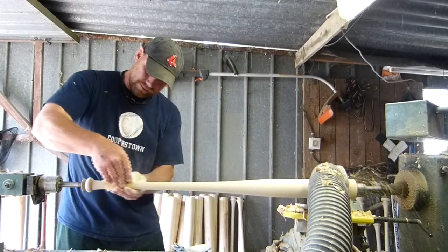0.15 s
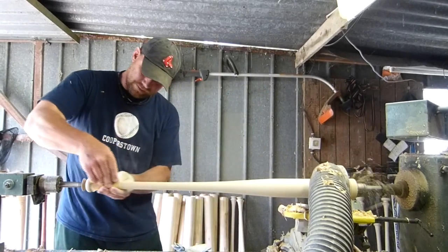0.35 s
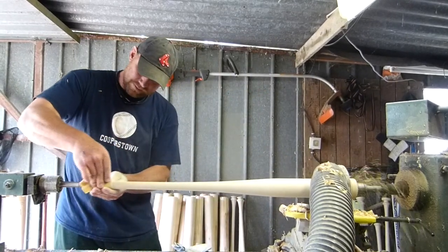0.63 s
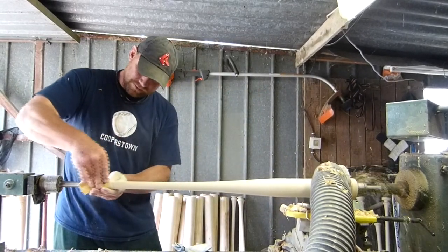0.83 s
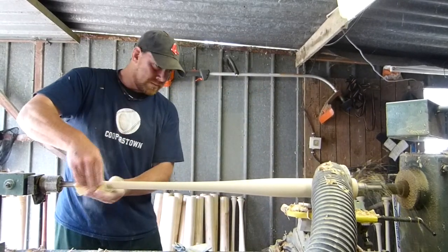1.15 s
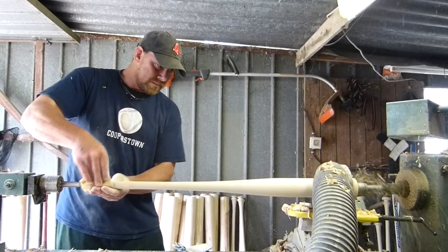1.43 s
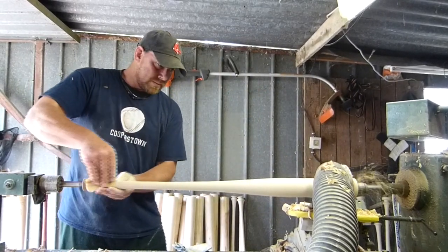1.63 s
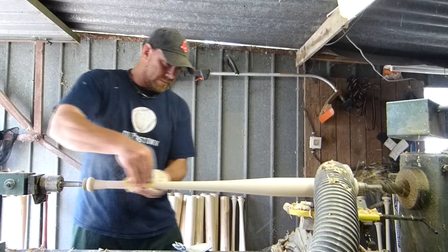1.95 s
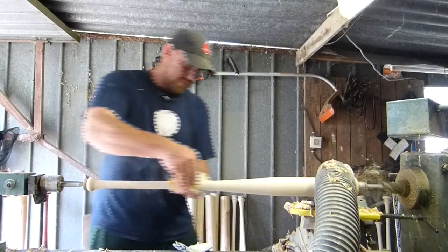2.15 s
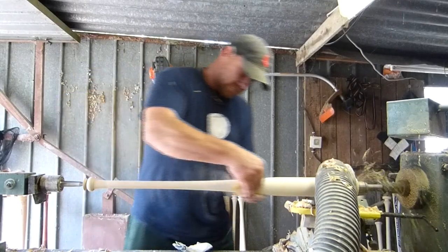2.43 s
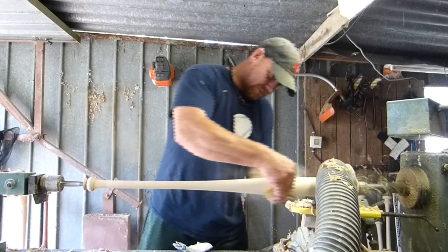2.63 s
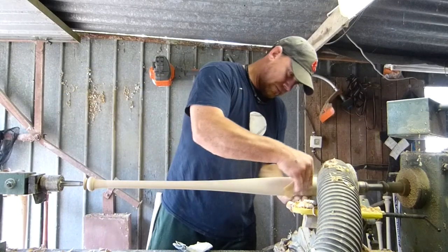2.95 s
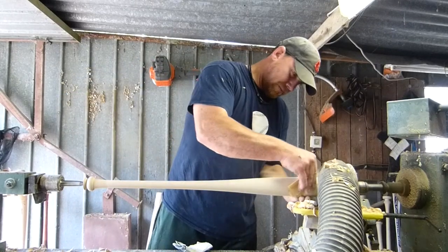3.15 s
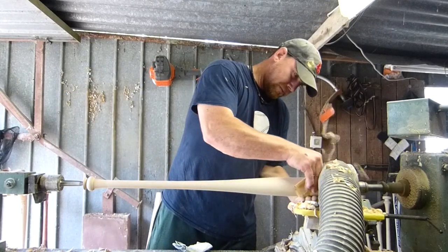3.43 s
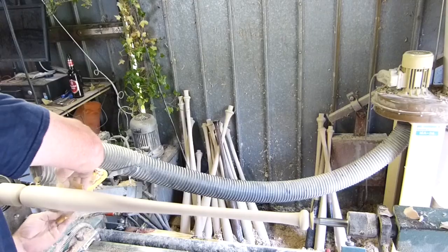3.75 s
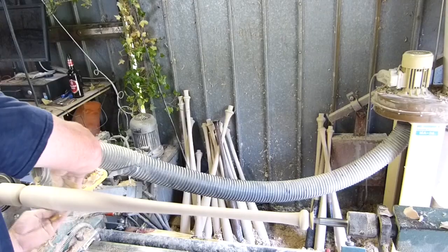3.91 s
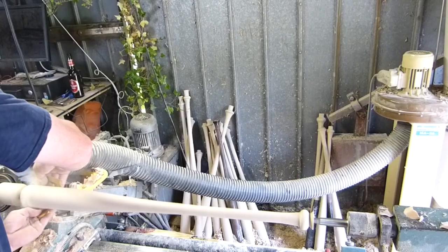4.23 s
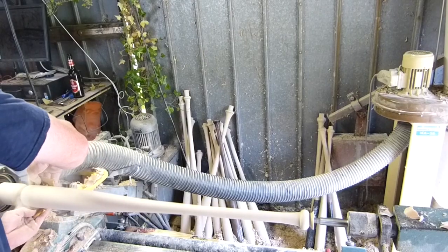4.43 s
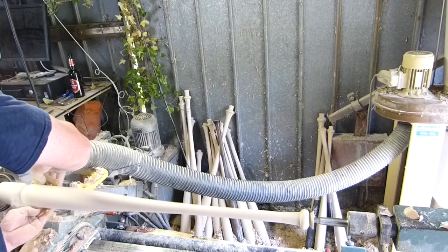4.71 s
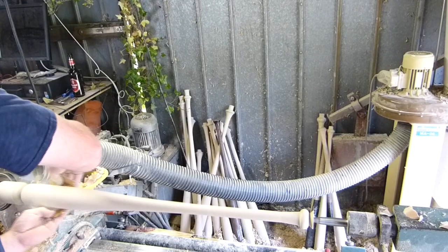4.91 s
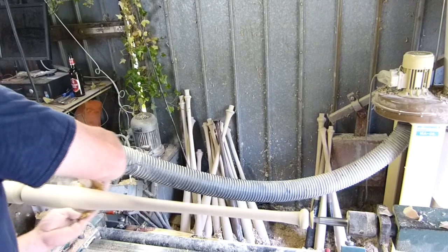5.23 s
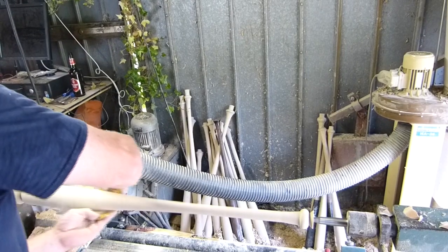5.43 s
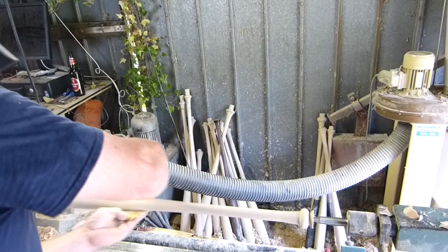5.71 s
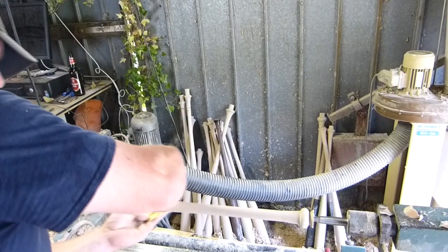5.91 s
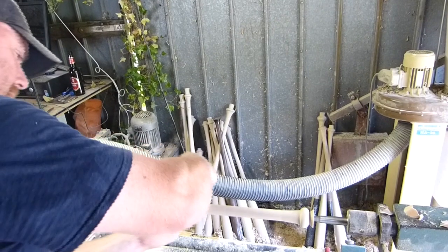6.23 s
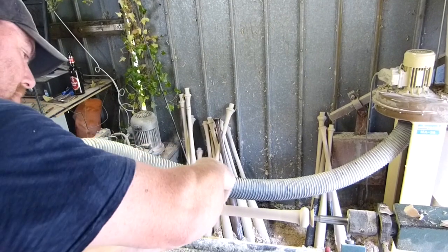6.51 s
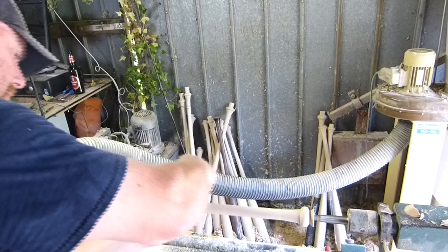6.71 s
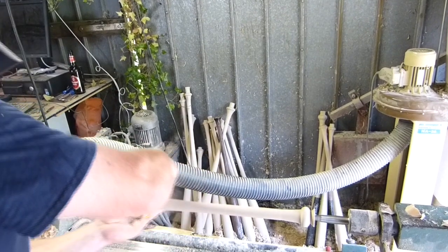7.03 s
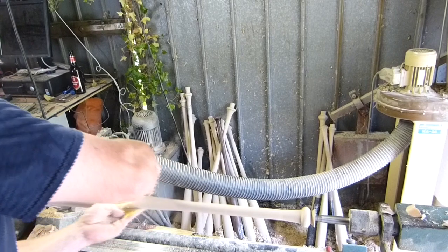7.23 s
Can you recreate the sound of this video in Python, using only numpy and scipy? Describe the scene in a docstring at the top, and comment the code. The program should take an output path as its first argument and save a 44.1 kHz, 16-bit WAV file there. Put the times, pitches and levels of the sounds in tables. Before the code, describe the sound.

Bright gritty sanding on turning wood with short squeals and a steady machine drone, first from across a bench, then suddenly loud and close.

```python
"""In a sheet-metal shed, sandpaper is pressed on a wooden bat spinning on a lathe while a dust blower runs.
It is heard first from across the bench, then, after a quick crossfade, from close beside the hands.
Grit noise makes a bright hiss and excites the bat's resonances as a rasp; their balance changes as the hands
move along. Squeals, short rings and one low lathe tone are noise through narrow resonances, the folded paper
whistles, and lathe and blower add wavering tones and a rush of air that swell and dip."""
import sys
import numpy as np
from scipy import signal
from scipy.fft import rfft, irfft, next_fast_len
from scipy.io import wavfile
from scipy.ndimage import uniform_filter1d

SR = 44100
rng = np.random.default_rng(int(sys.argv[2]) if len(sys.argv) > 2 else 0)


def log_audio(samples):
    """Write samples as a 16-bit WAV file to the path given in sys.argv[1]."""
    # one column per channel
    frames = np.atleast_2d(samples).T
    # limit to full scale, then quantise
    limited = np.clip(frames, -1, 1)
    pcm = np.round(limited * 32767).astype(np.int16)
    wavfile.write(sys.argv[1], SR, pcm)


N = 325016
T = np.arange(int(3.85 * SR)) / SR  # time within one listening place, s
LENGTH = len(T)
SIZE = next_fast_len(LENGTH)
HZ = np.arange(SIZE // 2 + 1) * SR / SIZE + 1e-3  # frequency of each spectrum bin


def grit(scatter_db):
    """Impact excitation: countless grains bite the wood, some harder than others."""
    hardness = np.minimum(rng.exponential(size=LENGTH), 4)
    return rng.standard_normal(LENGTH) * undb(scatter_db * hardness)


# resonances of the bat: pitch_hz, width_hz, far_level_db, near_level_db (relative within a group)
BAT_MODES = [(663, 26, -17, -1), (876, 46, -4.5, 0.5), (988, 39, -1, -3), (1086, 45, -11, 2.5),
             (1190, 41, -3, -4), (1299, 39, 0.5, -2), (1543, 59, -28, -7), (1709, 72, -4.5, -1.5),
             (2020, 480, -12, -1), (2168, 107, -5, 4.5), (2394, 22, -6, -2.5), (2718, 45, -2, 1.5),
             (2890, 90, -8.5, 1.5), (3133, 106, -8.5, 0.5), (3420, 99, -11, -4), (3970, 590, -7.5, -3.5),
             (4454, 250, -1.5, 1.5), (4665, 780, -5, 0.5)]
MIDDLE_FROM_HZ, UPPER_FROM_HZ = 1600, 3700
# spectrum of the paper's hiss: frequency_hz, relative level_db (per Hz)
FAR_HISS_SPECTRUM = [(200, -70), (1500, -25), (2500, -14), (3500, -10.5), (5500, -6), (7000, -5),
                     (8000, -8), (9000, -11.5), (11000, -18), (13000, -30), (15800, -39)]
NEAR_HISS_SPECTRUM = [(200, -72), (1500, -19.5), (2500, -33), (3500, -9.5), (5500, 0), (6500, 0),
                      (7500, 2.5), (9000, -1), (11000, -6), (13000, -13), (15800, -25.5)]
# resonances of the folded paper: pitch_hz, width_hz, relative level_db
FAR_FOLD_MODES = [(6900, 220, -13), (7720, 230, 10), (7900, 200, -3)]
NEAR_FOLD_MODES = [(6400, 180, -21), (7210, 1150, 13), (8700, 280, 0)]
THROB_HZ, THROB_DB = 31, .33


def sanding(levels_db, near):
    """Source-filter principle: grit drives three groups of bat modes, the hiss and the whistle."""
    bat_column = 3 if near else 2
    hiss = NEAR_HISS_SPECTRUM if near else FAR_HISS_SPECTRUM
    fold = NEAR_FOLD_MODES if near else FAR_FOLD_MODES
    responses = []
    for low, high in [(0, MIDDLE_FROM_HZ), (MIDDLE_FROM_HZ, UPPER_FROM_HZ), (UPPER_FROM_HZ, SR)]:
        group = [(row[0], row[1], row[bat_column]) for row in BAT_MODES if low <= row[0] < high]
        responses.append(modes(group))
    responses += [slope(hiss), modes(fold)]
    rub = sum(undb(db) * heard(grit(1.03), response, near) for db, response in zip(levels_db, responses))
    throb_db = THROB_DB * np.sin(2 * np.pi * THROB_HZ * T + walk(3))
    uneven_hand = undb(.3 * walk(90) + throb_db)
    return uneven_hand * patchy(echoes(rub), patch_db=.2, quick_db=1.05)


# how hard the hand presses, as the level of the hiss: time_s, level_db
FAR_PRESSURE = [(0.0, -40), (0.7, -41.5), (0.74, -40), (1.43, -42), (1.56, -40), (1.64, -38), (2.67, -38.5),
                (2.77, -41), (2.79, -39.5), (3.0, -36), (3.77, -39)]
NEAR_PRESSURE = [(3.82, -22.5), (4.6, -24.5), (4.84, -23.5), (4.86, -23), (5.12, -21.5), (5.6, -24.5),
                 (5.72, -25), (6.47, -23), (6.57, -23.5), (7.37, -22)]
# the wood under the travelling paper, levels relative to the hiss before bites:
# time_s, low_modes_db, middle_modes_db, upper_modes_db, whistle_db
FAR_WOOD = [(0, -7, -8, -6.5, -29), (1.4, -4, -2, -2.5, -27), (1.9, -5, -3.5, -1.5, -27),
            (2.35, -9, -2, -2.5, -27), (2.53, -5, 1.5, -2, -27), (2.58, -1.5, 2.5, -4, -27),
            (2.72, -5, -0.5, -4, -23), (2.86, -8, -6.5, -7, -9), (2.98, -7, -11.5, -13, -7),
            (3.2, -14, -11.5, -18, -11), (3.41, -11, -11, -7, -5.5), (3.62, -10.5, -15, -23, -8),
            (3.8, -15, -9, -11.5, -13)]
NEAR_WOOD = [(3.8, -19, -14.5, -10, -2.5), (4.5, -13.5, -13.5, -5.5, 1), (5.3, -17, -19.5, -9, -5),
             (5.55, -15, -15.5, -11, 0), (5.8, -11.5, -13.5, -19, -8), (6.1, -12, -10.5, -6.5, -4),
             (6.6, -11, -8, -5.5, -6.5), (7.37, -12, -11.5, -7, -6.5)]
# the paper bites harder for a moment: loudest_s, added_level_db, swell_s
NEAR_BITE_TIMES = [(3.822, 1, 0.049), (3.945, 2, 0.043), (4.09, 0.5, 0.027), (4.246, 2.5, 0.05),
                   (4.545, 1.5, 0.087), (5.04, 2, 0.0089), (5.248, 1.5, 0.026), (5.323, 3.5, 0.01),
                   (5.49, 1.5, 0.051)]
BITE_RELEASE_S = .013
BITE_RASP_SHARE = 1.1  # the upper modes swell more than the hiss
# where the hands are heard: time_s, left_minus_right_db
FAR_HANDS = [(0, 0.59), (2.2, 0.11), (2.7, -0.18), (3.2, -0.47), (3.8, -0.43)]
NEAR_HANDS = [(3.8, 3.1), (5.3, 2.8), (6.2, 0.92), (7.37, 1.1)]


def rubbing(start, near):
    """Frictional excitation: hand pressure and place on the wood set the balance of hiss, rasp and whistle."""
    hiss_db, = curve(start, NEAR_PRESSURE if near else FAR_PRESSURE)
    wood_db = curve(start, NEAR_WOOD if near else FAR_WOOD)
    pan_db, = curve(start, NEAR_HANDS if near else FAR_HANDS)
    low_db, middle_db, upper_db, whistle_db = hiss_db + np.array(wood_db)
    bites = NEAR_BITE_TIMES if near else []
    bite_db = sum(db * swell(start + T, top, rise, BITE_RELEASE_S) for top, db, rise in bites)
    upper_db = upper_db + BITE_RASP_SHARE * bite_db
    levels_db = [low_db, middle_db, upper_db, hiss_db + bite_db, whistle_db + bite_db]
    return sanding(levels_db, near) * undb(np.array([pan_db, -pan_db]) / 2)


# bursts while the paper sweeps towards the barrel:
# loudest_s, level_db, rise_s, fade_s, excited_hz (centre of the modes excited)
SQUEAL_BURSTS = [(1.436, -40, 0.081, 0.015, 2690), (1.65, -46, .06, .15, 2750),
                 (1.843, -32.5, 0.026, 0.02, 2744), (1.955, -39, .05, 0.071, 2820),
                 (2.055, -42, .015, .03, 2740), (2.18, -40, 0.066, .03, 2820), (2.225, -39, .02, .09, 2750),
                 (2.37, -32, .012, .012, 2670), (2.44, -41, .04, .02, 2710), (2.455, -35, .015, .03, 2920),
                 (2.482, -21.5, 0.01, 0.027, 2710), (2.522, -29.5, .02, 0.05, 2784),
                 (2.525, -29, 0.022, 0.013, 2610), (2.56, -35, .02, 0.026, 2710),
                 (2.59, -33.5, 0.028, 0.025, 2850), (2.62, -38, 0.017, .012, 2630),
                 (2.665, -37, 0.013, .03, 2750), (2.693, -37, .012, .01, 2770)]
# close cluster of bat modes that squeals: pitch_hz, width_hz, level_db (before the mode acts twice)
SQUEAL_CLUSTER = [(2610, 80, 0), (2715, 65, 0), (2815, 65, 0), (2895, 70, 0)]
SQUEAL_REACH_HZ = 62
SQUEAL_STOPS_S, SQUEAL_STOP_FADE_S = 2.7, .01


def squeal():
    """Stick-slip: each burst excites the modes near its pitch, catching and slipping."""
    bursts = np.array([undb(db) * swell(T, top, rise, fade) for top, db, rise, fade, _ in SQUEAL_BURSTS])
    burst_hz = np.array(SQUEAL_BURSTS)[:, 4]
    out = 0
    for mode in SQUEAL_CLUSTER:
        share = np.exp(-((burst_hz - mode[0]) / SQUEAL_REACH_HZ) ** 2)
        singing = heard(grit(1.2), modes([mode]) ** 2, near=False)  # squared: the mode stays narrow
        out = out + share @ bursts * steadied(singing)
    stop = np.exp(-np.maximum(T - SQUEAL_STOPS_S, 0) / SQUEAL_STOP_FADE_S)
    return out * stop * undb(1.2 * walk(70))


STEADY = .45  # stick-slip evens out the swing of a singing mode: 0 not at all, 1 fully


def steadied(x, size=250):
    """Amplitude limiting by stick-slip: even out the swing of x, to rms 1."""
    power = uniform_filter1d(x ** 2, size).mean(axis=0) + 1e-9
    x = x / power ** (STEADY / 2)
    return x / x.std()


# short narrow rings from the rubbing, and one steady low hum tone near 395 Hz from the lathe:
# loudest_s, length_s, first_hz, last_hz, width_hz, level_db (before swell and catch)
RING_EVENTS = [(.16, 0.16, 3020, 3200, 105, -46), (1.7, 0.48, 4880, 4880, 140, -55),
               (1.78, 0.64, 9800, 9800, 600, -50), (1.93, 0.19, 4000, 4350, 200, -44),
               (2.4, 0.46, 4240, 4300, 250, -43.5), (2.42, 0.11, 9700, 9700, 500, -48),
               (2.51, 0.07, 3380, 3280, 105, -41.5), (2.555, .06, 8200, 8250, 150, -46),
               (2.595, .11, 1195, 1205, 40, -37), (2.61, .15, 1065, 1075, 70, -43),
               (2.64, 0.14, 1316, 1310, 110, -45), (2.695, .1, 1070, 1330, 50, -40),
               (2.71, .1, 1013, 1040, 60, -47), (2.595, 0.07, 3200, 3240, 105, -39),
               (2.635, .22, 425, 435, 10, -56), (2.62, .22, 880, 860, 42, -47),
               (2.651, 0.043, 4050, 4050, 97, -43), (2.68, 0.034, 8220, 8240, 105, -39),
               (2.853, 0.21, 1240, 1270, 110, -44.5), (2.86, 0.11, 6900, 7250, 105, -44),
               (3.035, .19, 7050, 6770, 105, -46), (4.14, .85, 399, 393, 6.5, -55),
               (4.749, 0.56, 7550, 7300, 105, -34), (4.8, 0.6, 9400, 9500, 200, -44),
               (5.25, .45, 7320, 7050, 110, -26), (5.749, .55, 1081, 1076, 65, -44.5),
               (6.93, 0.67, 1440, 1464, 83, -40), (6.92, .25, 4120, 4120, 150, -33),
               (7.03, 0.16, 3150, 3140, 70, -34), (6.4, .35, 4840, 4830, 230, -38),
               (7.0, .75, 4750, 4800, 380, -33)]
RING_RISE_SHARE, RING_FULLNESS = .38, .6
RING_CATCH_DB, RING_ROUGH_HZ = 1.6, 80


def rings_and_low_tone():
    """Narrow-band resonance: noise through one narrow filter each gives the rubbing's rings and a lathe tone."""
    out, catch = np.zeros(N), undb(RING_CATCH_DB * walk(50))
    noise = rng.standard_normal(N) + 1j * rng.standard_normal(N)
    for k, (top, length, first_hz, last_hz, width, db) in enumerate(RING_EVENTS):
        start, end = top - RING_RISE_SHARE * length, top + (1 - RING_RISE_SHARE) * length
        i = np.arange(int(start * SR), min(int(end * SR), N))
        pole = np.exp(-np.pi * width / SR)
        shake = noise[k * SR // 6:][:len(i) + SR // 10]  # 0.1 s extra lets the filter settle
        shake = signal.lfilter([1], np.convolve([1, -pole], [1, -pole]), shake)[-len(i):]
        shake = shake / abs(shake) ** np.exp(-width / RING_ROUGH_HZ)  # narrow bands hold their swing
        glide = 2 * np.pi * np.cumsum(np.linspace(first_hz, last_hz, len(i))) / SR
        ring = (shake * np.exp(1j * glide)).real
        angle = np.interp(i / SR, [start, top, end], [0, np.pi / 2, np.pi])
        envelope = np.sin(angle).clip(0) ** RING_FULLNESS
        out[i] += undb(db) * ring / ring.std() * catch[i % LENGTH] * envelope
    return out


# the bench and the lathe bed reflect the rubbing: delay_s (mean), level_db
REFLECTIONS = [(.001235, -15), (.0031, -15), (.0057, -15)]
ECHO_DRIFT = .025  # spread of the path change as the hands move, as a share


def echoes(x):
    """Comb filtering: the direct path plus close reflections whose delays wander."""
    i, out = np.arange(LENGTH), x
    for delay, db in REFLECTIONS:
        lag = delay * SR * (1 + ECHO_DRIFT * walk(1.5))
        out = out + undb(db) * x[:, i - lag.astype(int)]
    return out


def patchy(x, patch_db, quick_db, count=10):
    """Band-wise modulation: each band drifts and flickers as fresh and worn grit takes turns."""
    spectrum = rfft(x, SIZE)
    position = np.clip(np.log(HZ / 600) / np.log(14000 / 600), 0, 1) * (count - 1)
    out = 0
    for k in range(count):
        band = irfft(spectrum * np.clip(1 - abs(position - k), 0, 1), SIZE)[:, :LENGTH]
        out = out + undb(patch_db * walk(8) + quick_db * walk(100)) * band
    return out


# level of the hum and air rush as heard, which swells and dips: time_s, level_db
FAR_HUM_AND_AIR_LEVEL = [(0, -49), (1.45, -48), (1.75, -45.5), (2.2, -50), (2.6, -54), (3.8, -53.5)]
NEAR_HUM_AND_AIR_LEVEL = [(3.8, -47.5), (4.4, -45), (5.1, -44), (5.45, -48), (6.0, -43), (6.6, -40),
                          (7.37, -40.5)]


def hum_and_air(start, near):
    """Superposition: the tones and the air rush swell and dip together on one level curve."""
    level_db, = curve(start, NEAR_HUM_AND_AIR_LEVEL if near else FAR_HUM_AND_AIR_LEVEL)
    return undb(level_db - np.mean(level_db)) * hum(near) + air_rush(level_db, near)


SPINDLE_HZ, BLADE_HZ = 24.67, 284.8
# lathe tones: multiple (of the spindle rate), level_db, left_minus_right_db, left_lead_rad
FAR_LATHE_TONES = [(10, -71, 0, -0.49), (12, -65.5, -7, -0.51), (14, -84, 8, 1.1), (16, -54.5, 10.5, 0.41),
                   (20, -63, 9, -0.41), (22, -60, 8, 1.1), (24, -68, -23, -0.96), (26, -71, 4, 2.1),
                   (32, -51.5, 18, 1.8)]
NEAR_LATHE_TONES = [(4, -72, 0, 0), (7, -53, 0, 0), (8, -63, -1, -.1), (10, -58, 0, .4), (13, -59, 5, .4),
                    (14, -62, -1, -.3), (16, -56, -2, -2.7), (18, -63, 0, .5), (20, -62, -2, -.5),
                    (22, -56.5, -8, 1.6), (24, -57.5, 6, -.8), (26, -55, -2, .2), (27, -50, 6, -.2),
                    (29, -55, 2, 0), (32, -43.5, 1, .3)]
# blower tones: multiple (of the blade rate), level_db, left_minus_right_db, left_lead_rad
FAR_BLOWER_TONES = [(1, -56.5, 1, -0.08), (2, -53, 11, -0.26), (3, -53, -3, -0.83), (4, -57, -17, 0.41),
                    (5, -50.5, -19, -0.38), (7, -55.5, -8, -0.32), (9, -58.5, -4, -0.2)]
NEAR_BLOWER_TONES = [(3, -46, 1, .2), (4, -55, 2, .1), (5, -51, 5, 0), (7, -51, 3, .5)]
# other steady tones in the hum: pitch_hz, level_db, left_minus_right_db, left_lead_rad
FAR_OTHER_TONES = [(261, -66, -1, .1)]
NEAR_OTHER_TONES = [(261, -51.5, 1, .2), (722, -53, 2, 0), (1327, -54.5, -1, .2), (1467, -52, 1, .1),
                    (1517, -53, -2, -.1)]
FAR_WAVER_DB, NEAR_WAVER_DB = 1.0, 1.5


def hum(near):
    """Harmonics of rotation: spindle and blade tones, and a few others, waver in level and phase."""
    lathe = NEAR_LATHE_TONES if near else FAR_LATHE_TONES
    blower = NEAR_BLOWER_TONES if near else FAR_BLOWER_TONES
    rows = [(k * SPINDLE_HZ, *rest) for k, *rest in lathe]
    rows += [(k * BLADE_HZ, *rest) for k, *rest in blower]
    rows += list(NEAR_OTHER_TONES if near else FAR_OTHER_TONES)
    waver_db = NEAR_WAVER_DB if near else FAR_WAVER_DB
    out = 0
    for hz, db, pan_db, lead in rows:
        drift = .85 * min(1, .4 + hz / 1000) * walk(9)  # rad
        phase = 2 * np.pi * (hz * T + rng.random()) + drift
        channels = undb(np.array([[pan_db], [0]]))
        channels = channels / np.sqrt(np.mean(channels ** 2))
        waver = waver_db * (walk(11) + walk(3) * min(1, 120 / hz))
        tone = np.sqrt(2) * np.sin(phase + np.array([[lead], [0]]))
        out = out + undb(db + waver) * channels * tone
    return out


# spectrum of air rushing in hose and blower: frequency_hz, relative level_db (per Hz)
FAR_AIR_SPECTRUM = [(25, -50), (95, -45), (120, -22), (180, -15), (250, -10), (400, -5.5), (600, -1),
                    (1000, 4), (2000, -1), (4000, -8.5), (9000, -33)]
NEAR_AIR_SPECTRUM = [(25, -25), (85, -29), (110, -13), (200, -7), (370, -12), (450, -7), (600, -5),
                     (1000, -5.5), (2000, -1.5), (4000, -9.5), (9000, -32)]
FAR_AIR_DB, NEAR_AIR_DB = 7.5, 6.5  # added to the shared level curve


def air_rush(level_db, near):
    """Turbulence noise: air rushing in hose and blower is coloured noise of unsteady level."""
    spectrum = slope(NEAR_AIR_SPECTRUM if near else FAR_AIR_SPECTRUM)
    air_db = NEAR_AIR_DB if near else FAR_AIR_DB
    return undb(level_db + air_db + .7 * walk(5)) * heard(rng.standard_normal(LENGTH), spectrum, near)


# diffuse part that differs between the channels: frequency_hz, side_minus_mid_db
FAR_DIFFUSE = [(30, -2), (70, -13), (120, -22), (250, -18), (500, 0), (1300, -11.5), (1800, -8.5),
               (2700, -9), (4000, -24), (6500, -46), (8800, -2), (11000, -28)]
NEAR_DIFFUSE = [(30, -2), (70, -10), (120, -25), (250, -9), (370, 5), (600, -6.5), (1300, -6.5),
                (2400, -9.5), (4400, -21), (7000, -28), (8800, -2), (11000, -14.5)]


def heard(x, response, near):
    """Diffuse-field decorrelation: coloured x at rms 1 plus unrelated noise, opposite in the channels."""
    side = slope(NEAR_DIFFUSE if near else FAR_DIFFUSE)
    mid = irfft(rfft(x, SIZE) * response, SIZE)[:LENGTH]
    wide = irfft(rfft(rng.standard_normal(SIZE)) * response * side, SIZE)[:LENGTH] * x.std()
    return np.array([mid + wide, mid - wide]) / mid.std()


def modes(rows):
    """Modal superposition: (Hz, width Hz, dB) resonances; deep bass and top radiate weakly."""
    radiated = 1 / (1 + (400 / HZ) ** 3) / (1 + (HZ / 9000) ** 4)
    total = 0
    for k, (hz, width, db) in enumerate(rows):
        resonance = undb(db) / (1 + 1j * (HZ - hz ** 2 / HZ) / width)
        total = total + (-1) ** k * resonance  # neighbours in opposite sign
    return radiated * total


def slope(points):
    """Spectral envelope: gain at every frequency from (Hz, dB) points on a log axis."""
    hz, db = np.transpose(points)
    return undb(np.interp(np.log(HZ), np.log(hz), db))


def undb(db):
    """Logarithmic level: dB to amplitude gain."""
    return np.exp(np.asarray(db) * np.log(10) / 20)


def walk(rate, count=32):
    """Random modulation: levels held 1 / rate s and smoothed twice, at spread 1."""
    held = np.repeat(rng.standard_normal(int(LENGTH / SR * rate) + 2), count)
    x = uniform_filter1d(uniform_filter1d(held, count), count)
    return np.interp(T * rate * count, np.arange(len(x)), (x - x.mean()) / x.std())


def curve(start, rows):
    """Linear interpolation: columns of (s, ..) rows at every sample from the time start on."""
    s, *columns = np.transpose(rows)
    return [np.interp(start + T, s, column) for column in columns]


def swell(t, top, rise, fade):
    """Exponential growth and decay: rise to 1 at the time top, then fall."""
    return np.exp(-np.where(t < top, (top - t) / rise, (t - top) / fade))


CHANGE_S, FADE_S = 3.794, .018


def scene():
    """Linear crossfade: across the bench, then close by, with the rings and low tone over both."""
    far, near = np.zeros((2, 2, N))
    near_start = (N - LENGTH) / SR
    far[:, :LENGTH] = squeal() + rubbing(0, near=False) + hum_and_air(0, near=False)
    near[:, -LENGTH:] = rubbing(near_start, near=True) + hum_and_air(near_start, near=True)
    share = np.clip((np.arange(N) / SR - CHANGE_S) / FADE_S + .5, 0, 1)
    return (1 - share) * far + share * near + rings_and_low_tone()


TOP_HZ = 15800


def record(dry):
    """Band limiting: a steep elliptic low-pass cuts the top."""
    return signal.sosfilt(signal.ellip(12, .2, 80, TOP_HZ, fs=SR, output="sos"), dry)


dry = scene()
out = record(dry)
log_audio(out)
```